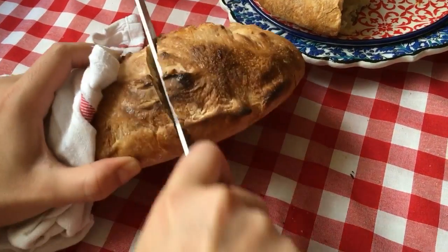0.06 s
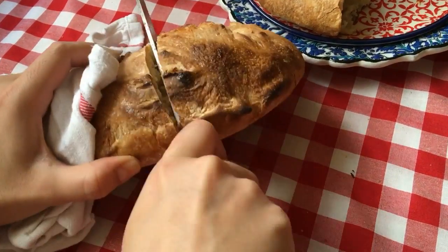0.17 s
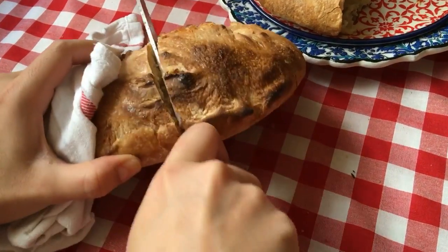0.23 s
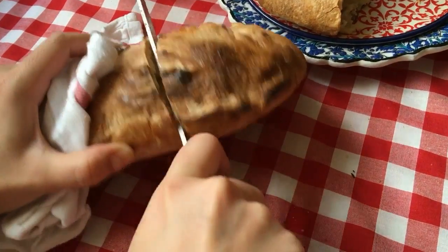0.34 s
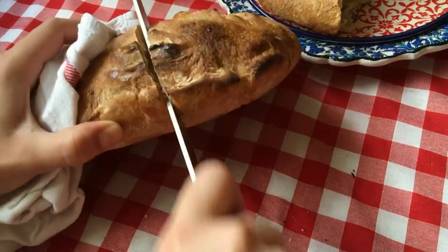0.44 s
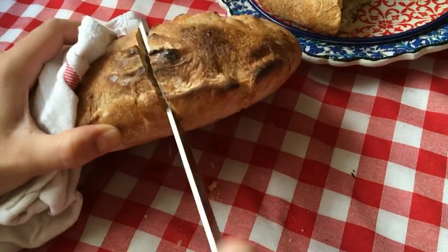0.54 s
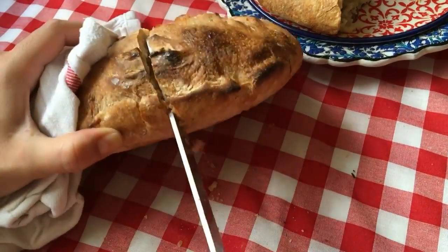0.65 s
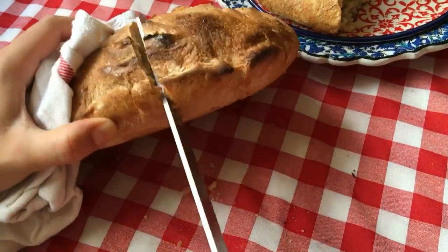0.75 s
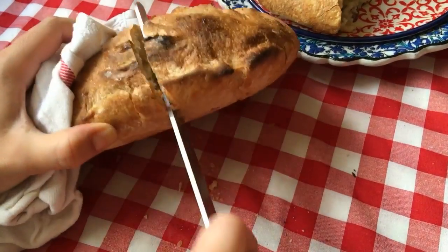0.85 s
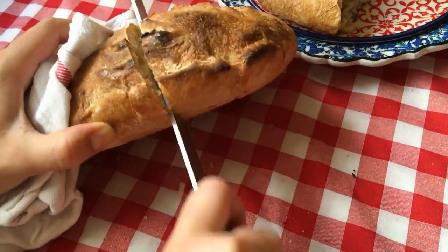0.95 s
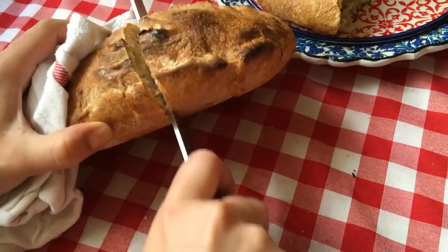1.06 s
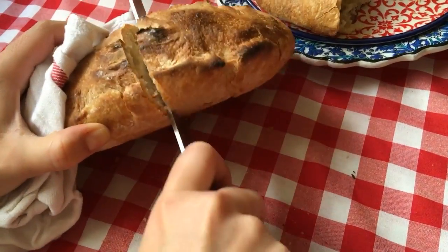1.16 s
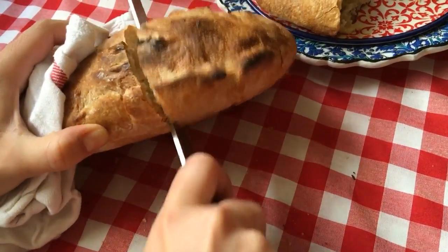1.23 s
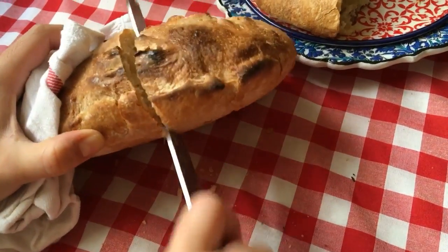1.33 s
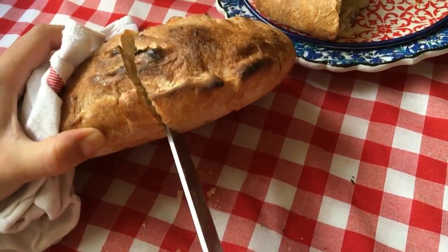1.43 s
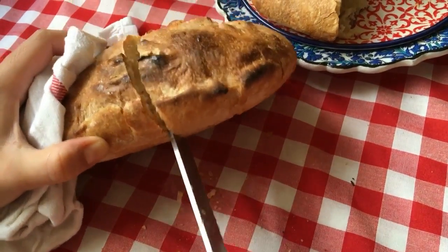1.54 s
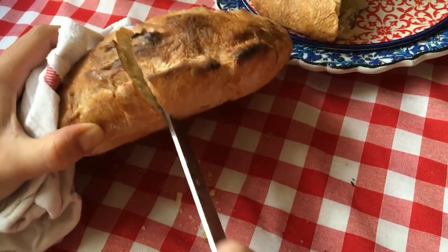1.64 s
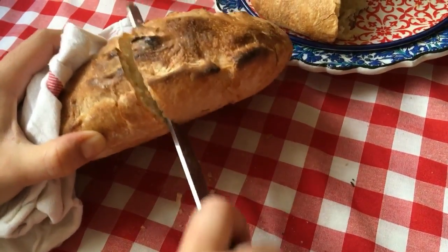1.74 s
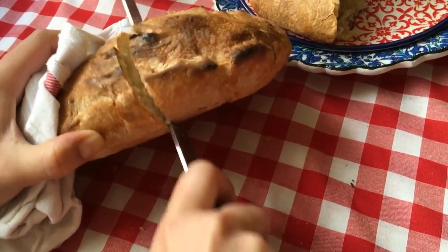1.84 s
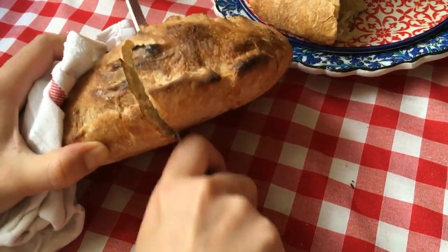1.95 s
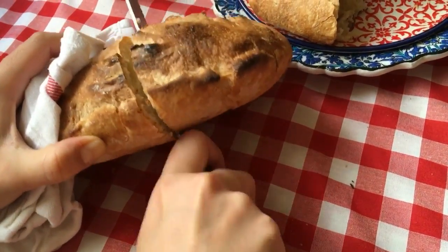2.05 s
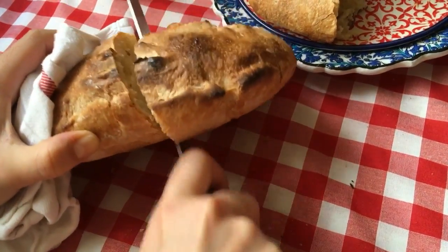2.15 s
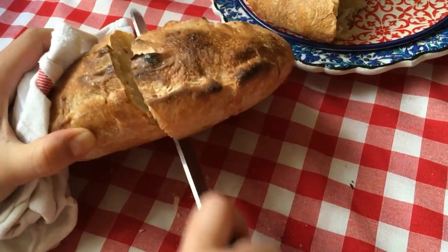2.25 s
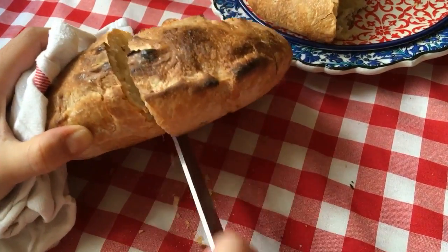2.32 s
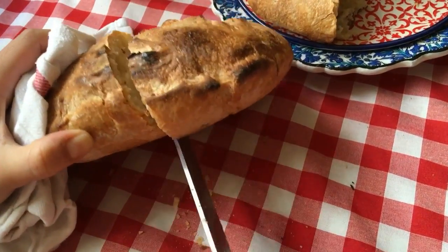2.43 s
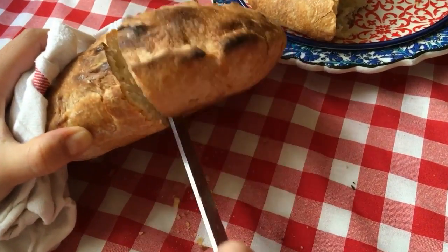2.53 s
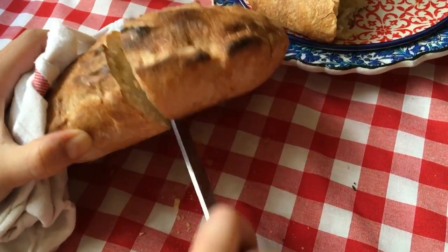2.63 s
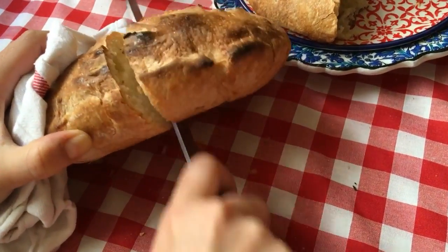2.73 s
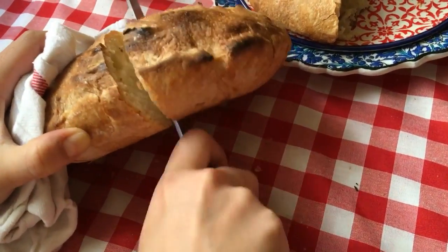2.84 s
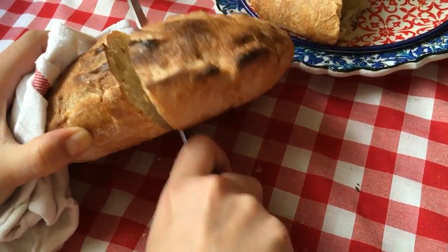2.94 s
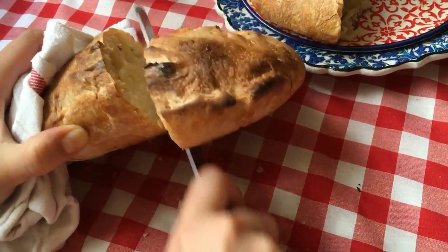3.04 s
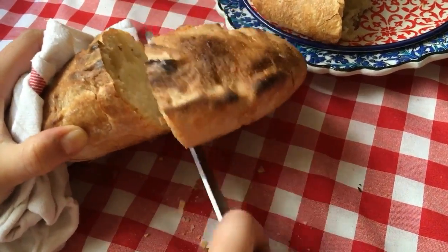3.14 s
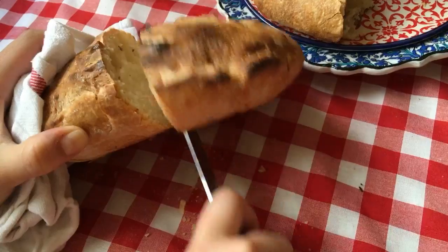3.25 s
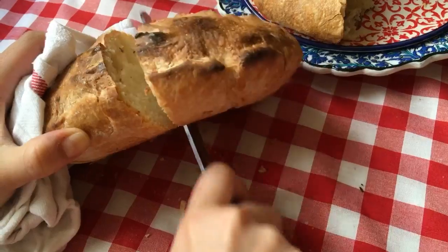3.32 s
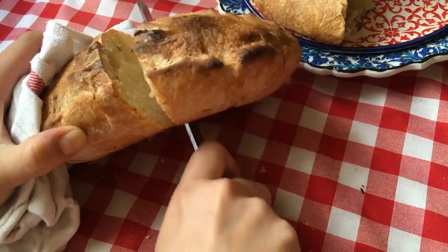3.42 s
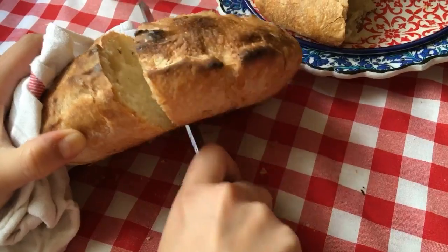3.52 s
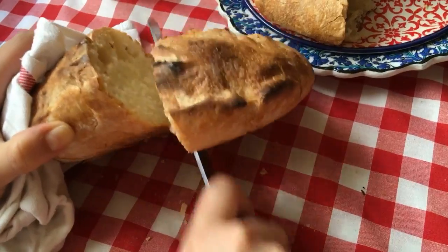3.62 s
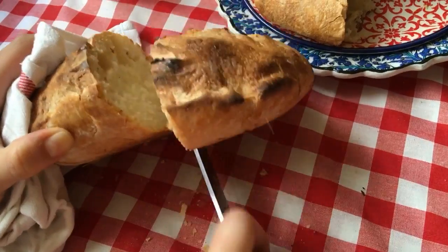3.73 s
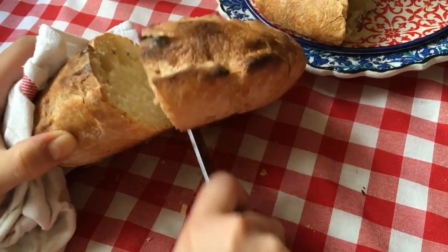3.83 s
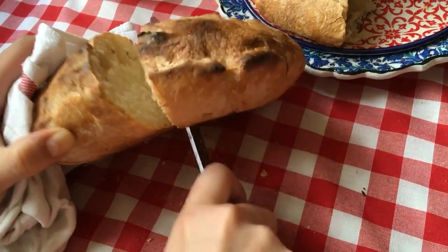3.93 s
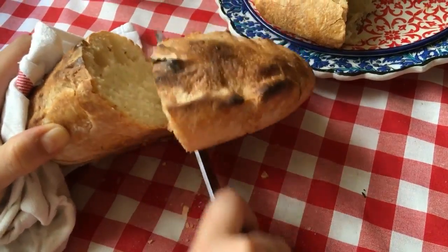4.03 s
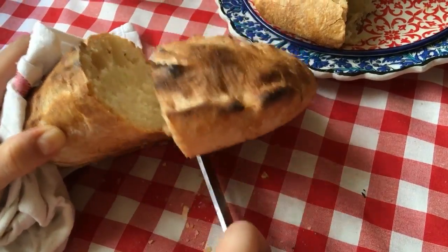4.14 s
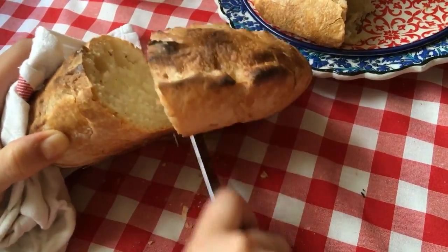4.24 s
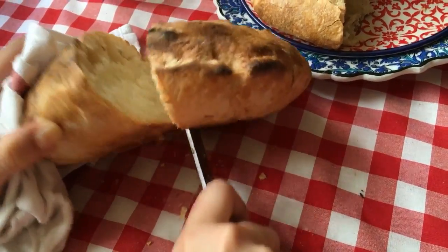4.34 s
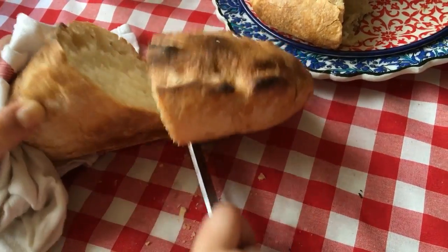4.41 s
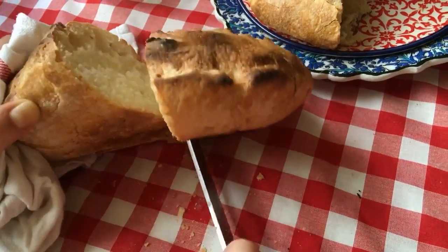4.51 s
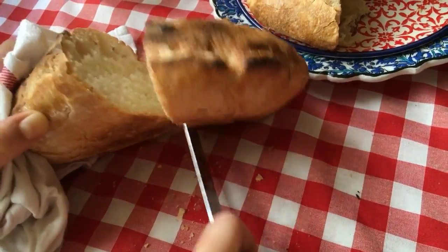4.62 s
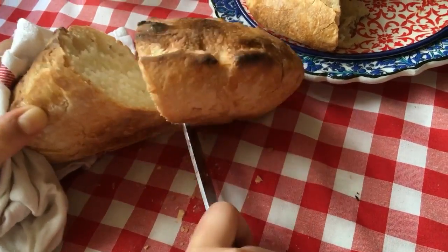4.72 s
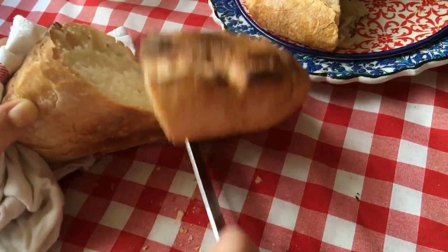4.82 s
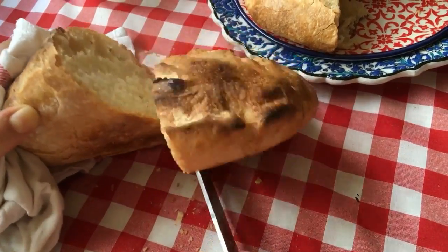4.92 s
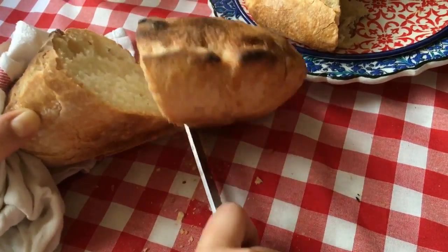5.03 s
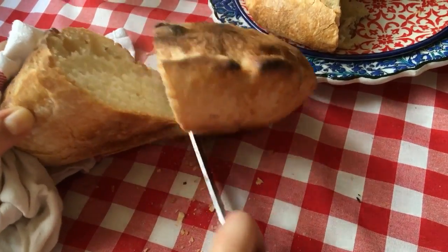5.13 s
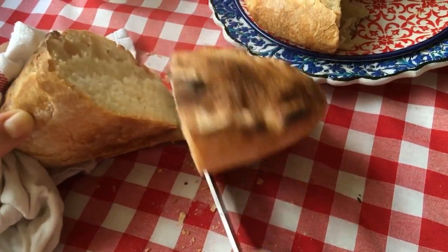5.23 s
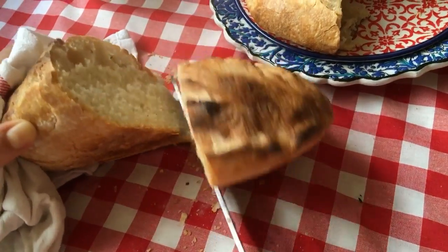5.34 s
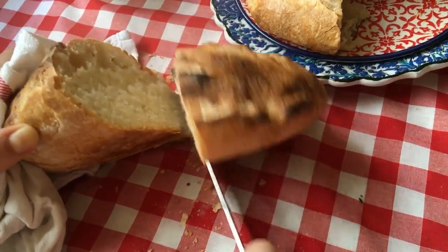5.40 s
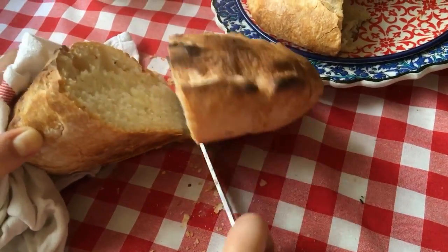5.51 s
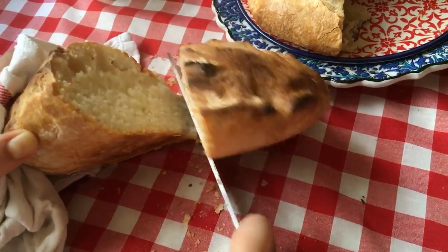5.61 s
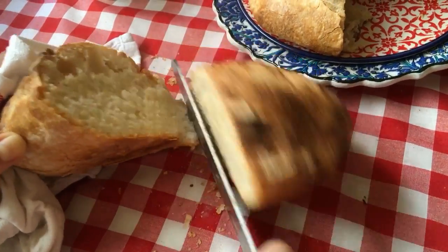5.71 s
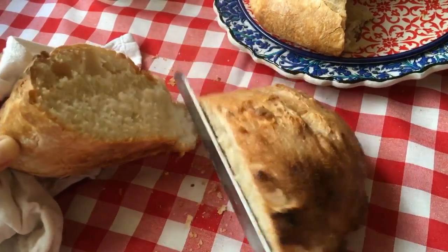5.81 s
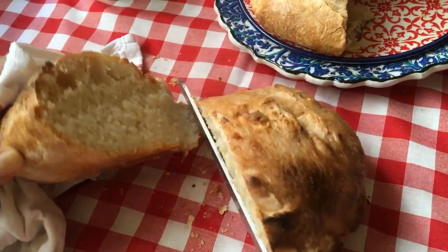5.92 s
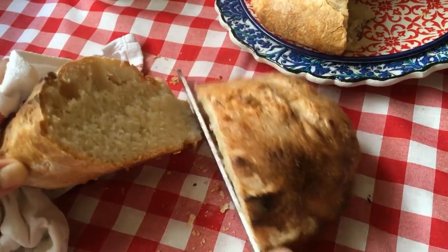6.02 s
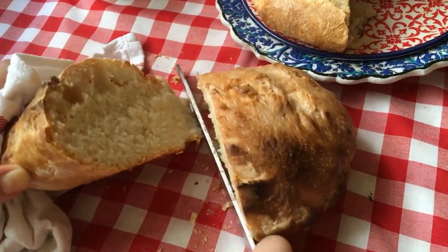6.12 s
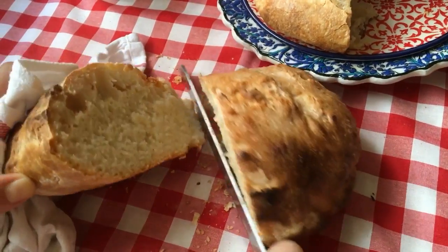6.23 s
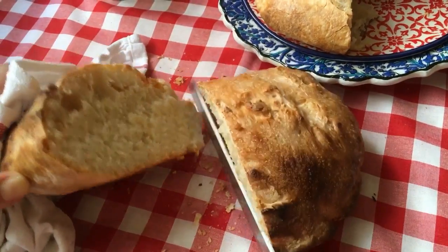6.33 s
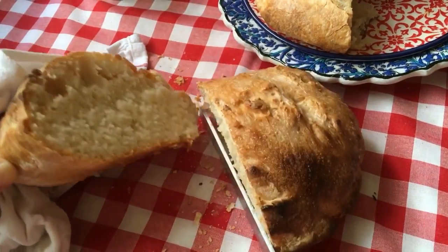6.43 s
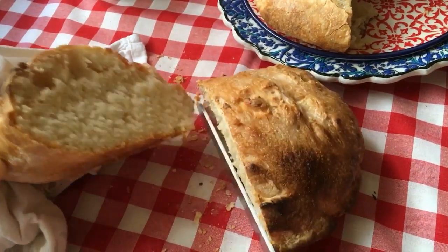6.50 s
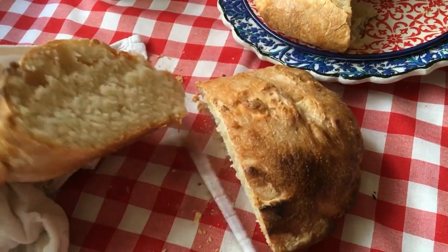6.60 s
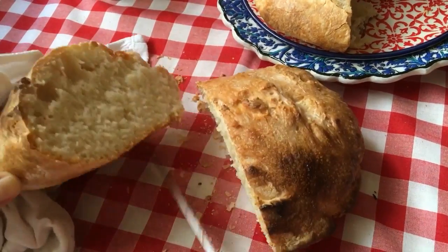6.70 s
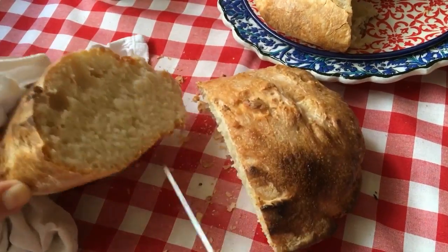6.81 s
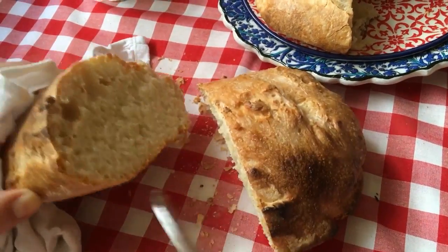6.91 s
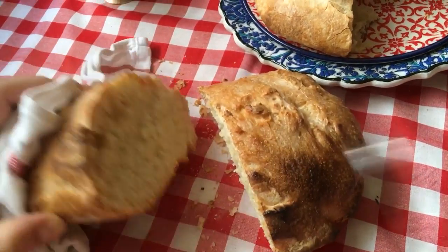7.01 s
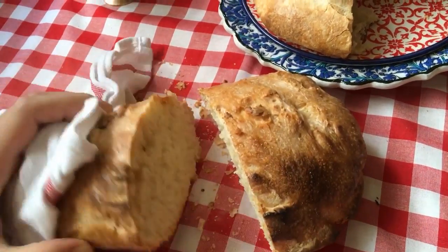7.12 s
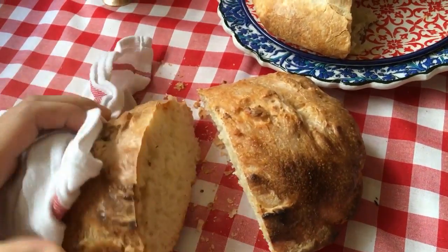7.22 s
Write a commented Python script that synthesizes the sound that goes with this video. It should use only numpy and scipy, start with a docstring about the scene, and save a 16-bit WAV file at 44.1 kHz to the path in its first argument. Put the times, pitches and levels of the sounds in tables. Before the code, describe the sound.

A serrated knife saws through a crusty loaf in crackling back-and-forth strokes, growing shorter and duller, then bumps and slides free with a faint steely ring.

```python
"""Sawing a crisp loaf

A serrated knife saws through a loaf on a cloth-covered table in a small kitchen.
Random tooth bites set off cracks and splinters in the crust and noisy hums in loaf and table.
Larger pieces snap in coloured bursts, and cracks ring in the blade through narrow resonances.
The strokes get shorter and duller towards the bottom crust; then the knife bumps, slides and rings free.
A short tail of fading noise gives the room, and steady coloured noise its still air."""
import sys
import numpy as np
from scipy import signal
from scipy.fft import rfft, irfft
from scipy.io import wavfile

SR = 44100
rng = np.random.default_rng(int(sys.argv[2]) if len(sys.argv) > 2 else 0)


def generate_wav(sig):
    """Save sig (samples, or channels by samples) to the path in sys.argv[1] as 16-bit PCM at SR."""
    pcm = np.round(np.clip(np.atleast_2d(sig).T, -1, 1) * 32767).astype(np.int16)
    wavfile.write(sys.argv[1], SR, pcm)


N = 320166
TIME = np.arange(N) / SR


def from_db(db):
    """Turn decibels into gain."""
    return np.exp(np.asarray(db) * np.log(10) / 20)


def unit_energy(x):
    """Scale so that the squares sum to one."""
    return x / np.sqrt(np.sum(x ** 2) + 1e-20)


def through(x, response):
    """Pass a sound through an impulse response."""
    return signal.oaconvolve(x, response)[:len(x)]


def response_of(spectrum, size=8192):
    """Make an impulse response with the given colour that starts at once (minimum phase)."""
    hz, db = np.transpose(spectrum)
    grid = np.maximum(np.fft.rfftfreq(size, 1 / SR), 1)
    colour_db = np.interp(np.log(grid), np.log(hz), db)
    cepstrum = irfft(np.log(from_db(colour_db)))
    # Folding the cepstrum onto its first half puts all the sound after time zero.
    cepstrum[1:size // 2] *= 2
    cepstrum[size // 2 + 1:] = 0
    return unit_energy(irfft(np.exp(rfft(cepstrum))))


def evened(x, span_s):
    """Hold the running rms near one while keeping the faster grain."""
    window = signal.windows.hann(int(span_s * SR) | 1)
    power = signal.oaconvolve(x ** 2, window / window.sum(), "same")
    return x / np.sqrt(np.maximum(power, 0) + 1e-4 * np.mean(x ** 2))


def resonance(x, hz, width_hz):
    """Ring at one frequency, with gain one at the top; a narrow width rings longer."""
    radius = np.exp(-np.pi * width_hz / SR)
    angle = 2 * np.pi * min(hz, .45 * SR) / SR
    feed = np.array([1, 0, -1]) * (1 - radius * radius) / 2
    feedback = [1, -2 * radius * np.cos(angle), radius * radius]
    return signal.lfilter(feed, feedback, x + 1e-18)


def wander(per_s):
    """Drift slowly by chance, with random turning points of spread one."""
    knots = rng.standard_normal(int(TIME[-1] * per_s) + 2)
    return np.interp(TIME * per_s, np.arange(len(knots)), knots)


def dying(rows, rise_s):
    """Gain of a set of blows (start s, dB, time to fall 60 dB in s): each rises quickly and dies away."""
    total = 0
    for s, db, t60 in rows:
        fall_db = 60 * np.maximum(TIME - s, 0) / max(t60, .005)
        total = total + from_db(db - fall_db) * np.clip(1 + (TIME - s) / rise_s, 0, 1)
    return total


def fracture(t60, crumble_db, size=1536):
    """A sharp break and a dying spray of tiny ones, coloured by the pitch of the flake that comes off."""
    spray = rng.standard_normal(size) * rng.exponential(1, size)
    fade = from_db(-60 * TIME[:size] / max(t60, .002))
    burst = from_db(crumble_db) * unit_energy(spray * fade)
    burst[0] += 1
    hz = 900 * 2 ** rng.uniform(0, 3.3)
    return unit_energy(burst + 2.2 * resonance(burst, hz, hz / 9))


def tooth_catches(per_s, spread_db):
    """Teeth catch at random moments: many small bites, a few big ones."""
    sizes = from_db(spread_db * np.minimum(rng.exponential(1, N), 4))
    return (rng.random(N) < per_s / SR) * sizes * rng.choice([-1, 1], N)


def flakes(catches, t60, crumble_db, count=48):
    """Every bite breaks one of many kinds of flake, each kind with a crack of its own."""
    cracks = [fracture(t60, crumble_db) for k in range(count)]
    dealt = rng.integers(0, count, N)
    out = np.zeros(N + SR)
    for at in np.flatnonzero(catches):
        crack = cracks[dealt[at]]
        out[at:at + len(crack)] += catches[at] * crack
    return out[:N]


def scraped(bites, colour, rub_db, span_s):
    """Bites and the smooth rub of the blade's side, sounding in one part; rms near 1."""
    drive = evened(bites, 0.27) + from_db(rub_db) * rng.standard_normal(N)
    return evened(through(drive, response_of(colour)), span_s)


# Colour of the kitchen's still air. Each row: frequency in Hz, relative level per Hz in dB.
AIR = [(18, -34), (30, -12), (53, -7), (103, -17), (161, -11.5), (174, -15), (415, -18), (486, -30.5),
       (1720, -33.5), (3490, -49.5), (16000, -51.5)]
AIR_DB = -53.5


def still_air():
    """The quiet room is steady noise with a fixed colour."""
    return from_db(AIR_DB) * through(rng.standard_normal(N), response_of(AIR))


# The loaf rocks and thumps the table. Each row: start in seconds, table level in dB,
# loaf bounce level in dB, time to die away by 60 dB in seconds. A small trim follows in shaking().
ROCKS = [(0.0, -40, -42.5, 0.46), (0.438, -33, -28.5, 0.15), (0.86, -40, -36.5, 0.34),
         (1.385, -30.5, -46, 0.32), (1.47, -39, -54.5, 0.37), (1.77, -39, -58, 0.93),
         (2.12, -38, -32, 0.12), (2.9, -43.5, -24, 0.16), (3.045, -31, -48, 0.45), (3.335, -26.5, -34, 0.2),
         (3.405, -45, -31.5, 0.29), (3.91, -27.5, -42, 0.53), (4.755, -30, -37, 0.25),
         (6.65, -38.5, -62, 0.25)]
THUMP_RISE_S = 0.019


def rocking():
    """Gains of table and loaf as each thump rises quickly and dies away."""
    table_thumps = dying([(s, db, t60) for s, db, _, t60 in ROCKS], THUMP_RISE_S)
    loaf_thumps = dying([(s, db, t60) for s, _, db, t60 in ROCKS], THUMP_RISE_S)
    return table_thumps, loaf_thumps


# One push or pull of the knife; the last two draw it out of the cut. Each row: teeth grip in seconds,
# hardest point in seconds, knife stops in seconds, then levels in dB, before small trims, of the
# crust crunch, fine splinters, loaf and table.
STROKES = [ (0.021, 0.154, 0.21, -36.5, -35.5, -39.5, -43), (0.273, 0.383, 0.43, -30.5, -32, -32.5, -42),
           (0.552, 0.678, 0.91, -43, -43, -47.5, -44.5), (1.013, 1.262, 1.401, -32.5, -34.5, -36, -36.5),
           (1.465, 1.537, 1.767, -44, -45, -45, -37), (1.903, 2.136, 2.256, -28.5, -32.5, -30, -33),
           (2.361, 2.576, 2.655, -39.5, -48, -36.5, -41), (2.788, 2.947, 3.143, -30, -36, -31, -34),
           (3.268, 3.393, 3.408, -31.5, -39, -32.5, -27.5), (3.51, 3.623, 3.695, -35.5, -45, -34.5, -35.5),
           (3.831, 3.926, 4.014, -43, -50, -37.5, -33), (4.08, 4.11, 4.168, -34, -43, -32, -40),
           (4.309, 4.373, 4.412, -36.5, -44, -29, -28), (4.496, 4.535, 4.586, -34.5, -43.5, -27, -37),
           (4.669, 4.746, 4.81, -42.5, -49.5, -32.5, -30), (4.873, 4.91, 4.99, -40, -44.5, -33, -36.5),
           (5.076, 5.1, 5.158, -37, -43, -32, -43), (5.251, 5.286, 5.324, -37, -46.5, -30.5, -40),
           (5.448, 5.515, 5.64, -47.5, -54, -44, -38.5), (5.704, 5.745, 5.8, -44.5, -49, -34, -41),
           (5.948, 6.016, 6.15, -43, -48, -40, -42), (6.22, 6.285, 6.34, -42, -50, -40, -38),
           (6.573, 6.593, 6.7, -58, -51, -52.5, -59), (6.781, 6.915, 6.91, -56.5, -51, -51.5, -57)]
GRIP_DB_PER_S, STOP_DB_PER_S = 534, 569
# Between strokes the held loaf still creaks, less as the cut opens; at the end the hands let go.
CREAK_FALL_DB_PER_S = 1.1
LET_GO_S, LET_GO_DB_PER_S = 6.35, 10


def stroke_force(levels_db, creak_db, swell_db, ease_db, grip_db_per_s=GRIP_DB_PER_S,
                 stop_db_per_s=STOP_DB_PER_S, fall_db_per_s=CREAK_FALL_DB_PER_S, lag_s=0):
    """Gain of one part over all strokes: grip, swell, ease and stop, above the creak of the held loaf."""
    t = TIME[::32] - lag_s  # a coarse clock is enough for slow changes
    let_go_db = LET_GO_DB_PER_S * np.maximum(t - LET_GO_S, 0)
    power = from_db(creak_db - fall_db_per_s * t - let_go_db) ** 2
    for (start, hardest, stop, *_), db in zip(STROKES, levels_db):
        cutting = np.interp(t, [start, hardest, stop], [-swell_db, 0, -ease_db])
        fading = grip_db_per_s * np.maximum(start - t, 0) + stop_db_per_s * np.maximum(t - stop, 0)
        power = power + from_db(db + cutting - fading) ** 2
    return np.interp(TIME, t + lag_s, np.sqrt(power))


def forces():
    """How hard table, loaf, its hollow, crust and splinters are driven by the strokes and the rocking."""
    crust_db, splinters_db, loaf_db, table_db = np.transpose(STROKES)[3:]
    crunch = stroke_force(crust_db, creak_db=-60, swell_db=7, ease_db=5.5)
    # A light touch already sheds splinters.
    splinter = stroke_force(splinters_db, creak_db=-67.5, swell_db=6.5, ease_db=5.5,
                            grip_db_per_s=341, fall_db_per_s=1.5)
    # The soft loaf answers to force more steeply than the crust.
    thrum = stroke_force(loaf_db, creak_db=-55, swell_db=10, ease_db=8.5)
    # The heavy parts answer later and die away more slowly.
    bounce = stroke_force(loaf_db, creak_db=-55, swell_db=10, ease_db=8.5,
                          stop_db_per_s=281, lag_s=0.013)
    # Only the height of a stroke shakes the table.
    rumble = stroke_force(table_db, creak_db=-53, swell_db=10.5, ease_db=7,
                          stop_db_per_s=170, lag_s=0.0081)
    table_thumps, loaf_thumps = rocking()
    return np.hypot(rumble, table_thumps), np.hypot(bounce, loaf_thumps), thrum, crunch, splinter


# Colours of the table, the bouncing loaf and its hollow thrum.
# Each row: frequency in Hz, relative level per Hz in dB.
TABLE = [(15, -50), (28, -21), (37, -13.5), (46, 4.5), (62, -4), (85, -10.5), (120, -24.5), (250, -77.5)]
BOUNCE = [(44, -29), (75, 4.5), (118, 3), (178, -8), (200, -10.5), (260, -28), (440, -120)]
THRUM = [(110, -30), (180, -4), (275, 3), (334, -1.5), (415, -3.5), (476, -11), (511, -8), (545, -15),
         (600, -11), (780, -36.5), (1320, -120)]


def shaking(catches, rumble, bounce, thrum, resistance):
    """The bites shake the table and loaf, and the loaf's hollow thrums with the uneven resistance."""
    table = from_db(2.5) * rumble * scraped(catches, TABLE, rub_db=-26.0, span_s=0.044)
    loaf = from_db(0.8) * bounce * scraped(catches, BOUNCE, rub_db=-14.0, span_s=0.038)
    hollow = from_db(-0.22) * thrum * scraped(catches, THRUM, rub_db=-12, span_s=0.043)
    return table + loaf + resistance * hollow


# Larger pieces of crust snapping. Each row: start in seconds, then levels in dB, before fixed boosts,
# of the crunch, splinters and bright tick, and the crumbling time to fall 60 dB in seconds.
SNAPS = [(0.064, -27, -13.5, -18, 0.046), (0.119, -33, -18.5, -42, 0.039), (0.159, -23.5, -13, -23, 0.046),
         (0.239, -29, -25.5, -33, 0.012), (0.2531, -37, -17.5, -18, 0.0091),
         (0.3062, -28, -19.5, -43, 0.034), (0.5322, -54.5, -30.5, -49, 0.0053),
         (0.728, -34, -28, -46, 0.0097), (0.817, -39, -30, -33, 0.024),
         (0.8602, -29.5, -29.5, -24.5, 0.026), (0.9943, -24.5, -41, -30.5, 0.014),
         (1.039, -24.5, -23, -28, 0.025), (1.0674, -25, -20, -21, 0.046), (1.165, -33, -35, -39, 0.014),
         (1.251, -27.5, -17.5, -41, 0.018), (1.3698, -19, -19.5, -42, 0.012),
         (1.493, -37, -29.5, -29.5, 0.008), (1.5213, -36, -24, -34, 0.045), (1.8336, -56, -36, -43, 0.014),
         (1.8902, -18.5, -9.5, -37, 0.031), (1.944, -19.5, -16.5, -39, 0.026),
         (1.9679, -20, -15.5, -29, 0.034), (1.9904, -20, -19, -45, 0.035), (2.0238, -20, -20, -44, 0.013),
         (2.065, -18.5, -18, -41, 0.015), (2.1253, -21.5, -20, -25, 0.013), (2.2, -16.5, -13.5, -36, 0.052),
         (2.7607, -53, -27, -43, 0.013), (2.778, -21.5, -19, -45, 0.024), (2.8207, -29, -23, -37, 0.017),
         (2.8903, -24, -16.5, -23.5, 0.025), (3.059, -16.5, -21.5, -45, 0.011),
         (3.0907, -20.5, -19, -43, 0.014), (3.1222, -22.5, -22.5, -49, 0.032),
         (3.3078, -27.5, -24.5, -29, 0.022), (3.4049, -26, -31, -50, 0.014),
         (3.5279, -29, -28.5, -52.5, 0.012), (3.8913, -28.5, -33, -60, 0.017),
         (4.0905, -24, -21.5, -44, 0.017), (4.1255, -30, -25, -42, 0.017), (4.4047, -34, -26, -45, 0.015),
         (4.5196, -26.5, -22.5, -32, 0.016), (4.6481, -45.5, -36.5, -36.5, 0.024),
         (4.6921, -34, -28.5, -54, 0.033), (4.791, -43, -28, -35, 0.0081), (5.0892, -33, -31, -39, 0.0085),
         (5.283, -32, -29.5, -40, 0.013), (5.5109, -33.5, -29.5, -49, 0.018), (5.715, -31, -29, -42, 0.023),
         (5.761, -32.5, -32, -29, 0.02), (6.0971, -34, -29, -42, 0.016), (6.133, -44, -31, -39, 0.013),
         (6.1934, -37.5, -43, -55, 0.0079), (6.2028, -34, -30, -41, 0.011),
         (6.236, -32.5, -28.5, -48, 0.005), (6.2736, -38, -33.5, -51, 0.0053),
         (6.5117, -51.5, -60, -48, 0.015), (6.5891, -43, -31.5, -56, 0.029)]
STALL_S, STALL_DB = 0.013, 3.5


def stalling():
    """Gain of the crunch, which sags while the teeth are stuck and is freed by each snap."""
    stuck = 0
    for s, *_ in SNAPS:
        moments = [s - 2 * STALL_S, s - STALL_S / 2, s, s + .002]
        stuck = stuck + np.interp(TIME, moments, [0, 1, 1, 0])
    return from_db(-STALL_DB * np.minimum(stuck, 1))


BOTTOM_CRUST_HZ, BOTTOM_CRUST_WIDTH_HZ, BOTTOM_CRUST_DB = 865, 560, -4
BOTTOM_FROM_S, BOTTOM_FULL_S = 3.9, 3.95


def deepened(crunch):
    """The thick bottom crust adds a low woody ring as the cut reaches it; rms near 1."""
    reached = np.interp(TIME, [BOTTOM_FROM_S, BOTTOM_FULL_S], [0, 1])
    ring = from_db(BOTTOM_CRUST_DB) * resonance(crunch, BOTTOM_CRUST_HZ, BOTTOM_CRUST_WIDTH_HZ)
    return evened(crunch + reached * ring, span_s=0.096)


# Colours of the crust and its splinters. Each row: frequency in Hz, relative level per Hz in dB.
CRUST = [(310, -24.5), (520, -6), (547, -10), (596, -1.5), (719, -4), (986, 0), (1200, 1.5), (1300, -1.5),
         (1540, -5), (1910, -1), (2660, -9), (2900, -20), (3770, -39), (6380, -120)]
SPLINTERS = [(1590, -43), (2700, -3.5), (2890, -5), (3770, -2.5), (4350, -8.5), (7230, -12.5), (7910, -16),
             (14500, -17), (15900, -20.5), (16500, -58)]


def breaking_crust(catches, crunch, splinter, resistance, grip):
    """Each bite cracks the crust and sheds splinters of varied size."""
    cracking = flakes(catches, t60=.012, crumble_db=2)
    varied = catches * from_db(3 * rng.standard_normal(N))
    shedding = flakes(varied, t60=.009, crumble_db=3)
    crust_sound = deepened(scraped(cracking, CRUST, rub_db=-6.5, span_s=0.062))
    crust = from_db(-0.7) * crunch * crust_sound
    fine = from_db(-3.0) * splinter * scraped(shedding, SPLINTERS, rub_db=-4.5, span_s=0.17)
    return resistance * (stalling() * crust + grip * fine)


# A fine rasp on the top crust, coarser bites further down.
# Each row: time in seconds, bites per second at full effort.
BITES = [(0, 820), (.37, 2100), (.7, 1670), (1.25, 1240), (2.0, 490), (2.5, 417), (3.0, 454), (4.5, 1020),
         (6.3, 800), (6.7, 6100)]
UNEVEN_DB, UNEVEN_PER_S = 2.14, 60


def sawing(grip):
    """The same bites break the crust and shake loaf and table; harder strokes bite more often."""
    rumble, bounce, thrum, crunch, splinter = forces()
    effort = np.sqrt(crunch / crunch.max())
    per_s = np.interp(TIME, *np.transpose(BITES)) * (1 + 2 * effort) / 3
    catches = tooth_catches(per_s, spread_db=5.5)
    # The crust resists unevenly from tooth to tooth.
    resistance = from_db(UNEVEN_DB * wander(UNEVEN_PER_S))
    body = shaking(catches, rumble, bounce, thrum, resistance)
    return body, breaking_crust(catches, crunch, splinter, resistance, grip)


# Steel resonances while the loaf grips the blade. Each row: middle frequency in Hz, width in Hz,
# gain in dB at the top crust, gain in dB at the bottom crust; the gains also wander.
BLADE_HELD = [(3770, 230, -7, -1.5), (4640, 92, -9, 1.5), (5540, 560, -22, 0.5), (7240, 60, -7, 2),
              (8880, 110, 3, 5), (9950, 160, -5, 3.5), (11470, 230, 0, -17), (11960, 130, -27, 8.5),
              (13800, 280, -7, -1), (15100, 200, -1, -4)]


def held_blade(crackle):
    """Cracks ring in the steel; each stroke clamps it anew, shifting its modes; depth changes their mix."""
    depth = np.interp(TIME, [1.5, 4.0], [0, 1])
    per_stroke = np.split(crackle, [round(start * SR) for start, *_ in STROKES[1:]])
    out = np.zeros(N)
    for hz, width_hz, top_db, bottom_db in BLADE_HELD:
        rings = [resonance(part, hz * rng.normal(1, .02), width_hz) for part in per_stroke]
        contact_db = 4.5 * wander(per_s=22)
        mix_db = top_db + depth * (bottom_db - top_db)
        out += from_db(mix_db + contact_db) * np.concatenate(rings)
    return out


# Colours of the loaf's thud and the bright tick of a snap.
# Each row: frequency in Hz, relative level per Hz in dB.
LOAF = [(47, -26), (80, 0.5), (119, 7.5), (183, -7), (276, 0.5), (542, -12), (600, -25), (780, -24),
        (1320, -120)]
TICK = [(2000, -45), (6000, -3), (8500, -8), (12000, -5.5), (16000, -5)]
SNAP_THUD_DB = -5.5  # the loaf's thud, relative to the crunch of the snap


def snaps():
    """A big break thuds in the loaf, cracks in the crust, throws splinters and starts with a bright tick."""
    loaf, crust, splinters, bright = map(response_of, (LOAF, CRUST, SPLINTERS, TICK))
    out = np.zeros(N + SR)
    for s, crunch_db, splinter_db, tick_db, t60 in SNAPS:
        crack = unit_energy(through(crust, fracture(t60, crumble_db=5)))
        spray = unit_energy(through(splinters, fracture(t60, crumble_db=9)))
        tick = unit_energy(through(bright, fracture(t60 / 2, crumble_db=-9.0)))
        snap = from_db(crunch_db + 19.0) * (from_db(SNAP_THUD_DB) * loaf - crack)
        snap = snap - from_db(splinter_db + 10.5) * spray
        snap = snap - from_db(tick_db + 14.0) * tick
        at = max(round(s * SR), 0)
        out[at:at + len(loaf)] += snap
    return out[:N]


# The knife bumps as it is drawn out. Each row: start in seconds, strength in dB.
KNOCKS = [(6.346, -40), (6.568, -42.5), (6.596, -37.5), (6.84, -46), (6.915, -32.5), (6.993, -46)]
# Modes of that bump. Each row: frequency in Hz, width in Hz, height in dB relative to the blow.
KNOCK = [(278, 73, 5), (417, 90, -2), (620, 42, -11.5), (866, 35, -10.5), (1308, 120, -28), (2600, 73, -16),
         (3250, 120, -7.5)]


def knocks():
    """Short hollow bumps of the knife: each blow sets off a few quickly fading modes."""
    blows = np.zeros(N)
    for s, db in KNOCKS:
        blows[round(s * SR)] = from_db(db)
    out = np.zeros(N)
    for hz, width_hz, db in KNOCK:
        height = from_db(db) * SR / (2 * np.pi * width_hz)  # undoes the loss of a narrow resonance
        out += height * resonance(blows, hz, width_hz)
    return out


# Modes of the free blade. Each row: frequency in Hz, level in dB relative to the other modes.
BLADE = [(3854, -68), (4527, -62), (4650, -58), (5949, -71), (7305, -62), (8775, -64.5), (9948, -83),
         (10379, -71), (11359, -72), (12096, -69), (13135, -75), (14034, -70), (14901, -70)]
# The blade rings as it touches the plate or clips the crust. Each row: start in seconds, # level in dB before
# the ting and scrape are mixed, time to die away by 60 dB in seconds.
BLADE_TAPS = [(6.347, -59, 0.15), (6.584, -56, 0.36), (6.915, -38.5, 0.017), (6.969, -45.5, 0.15)]
TAP_RISE_S = 0.0056
TAP_CLEAN_DB, TAP_SCRAPE_DB = 0, -2.5  # a tap is part pure ting, part scraped ring
# Towards the end the blade slides along the crust, singing louder and louder.
SLIDE_START_S, SLIDE_END_S = 6.77, 6.96
SLIDE_DB, SLIDE_SWELL_DB = -53, 20


def free_blade():
    """Undamped steel sings unevenly where it scrapes the crust and tings where it touches the plate or clips
    the crust."""
    scrape = evened(tooth_catches(per_s=6000, spread_db=1.5), 0.065)
    singing, ting = np.zeros(N), np.zeros(N)
    for hz, db in BLADE:
        contact_db = 4 * wander(per_s=18)
        singing += from_db(db + contact_db) * resonance(scrape, hz, width_hz=66)
        ting += from_db(db) * np.sin(2 * np.pi * (hz * TIME + rng.random()))
    travel = (TIME - SLIDE_START_S) / (SLIDE_END_S - SLIDE_START_S)
    slide_db = SLIDE_DB - SLIDE_SWELL_DB * (1 - np.clip(travel, 0, 1))
    slide = from_db(slide_db) * (travel > 0) * (travel < 1)
    taps = dying(BLADE_TAPS, TAP_RISE_S)
    scraped_ring = (slide + from_db(TAP_SCRAPE_DB) * taps) * evened(singing, 0.066)
    return scraped_ring + from_db(TAP_CLEAN_DB) * taps * ting / ting.std()


KITCHEN_T60_S, KITCHEN_DB = 0.4, -27


def kitchen(x, size=16384):
    """A short diffuse tail that starts when the first wall answers."""
    age = TIME[:size]
    tail = rng.standard_normal(size) * from_db(-60 * age / KITCHEN_T60_S) * (age > .004)
    dull = signal.sosfilt(signal.butter(1, 7000, fs=SR, output="sos"), tail)
    return from_db(KITCHEN_DB) * through(x, unit_energy(dull))


def scene():
    """Knife, loaf and table sound directly and through the room's tail, over still air."""
    free = np.interp(TIME, [6.52, 6.58, 7.02, 7.1], [0, 1, 1, 0])  # 1 while the blade is out of the cut
    body, crackle = sawing(grip=1 - 0.68 * free)
    crackle = crackle + snaps()
    near = body + crackle + (1 - free) * held_blade(crackle) + knocks() + free_blade()
    return (near + kitchen(near) + still_air())[None]


CUTOFF_HZ = 15900


def record(dry):
    """The microphone drops the deepest bass; the top is cut steeply."""
    thinned = signal.sosfilt(signal.butter(2, 38, "high", fs=SR, output="sos"), dry)
    return signal.sosfilt(signal.ellip(10, .3, 80, CUTOFF_HZ, fs=SR, output="sos"), thinned)


dry = scene()
out = record(dry)
generate_wav(out)
```